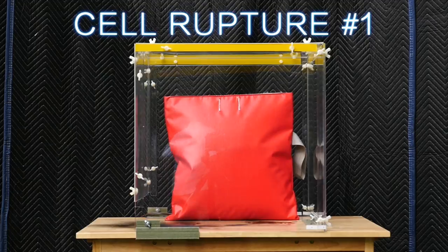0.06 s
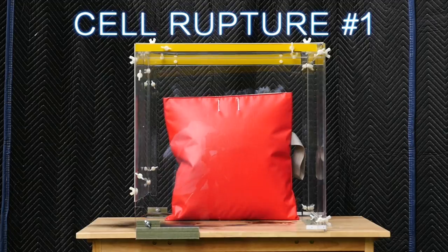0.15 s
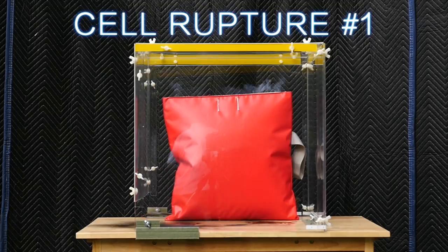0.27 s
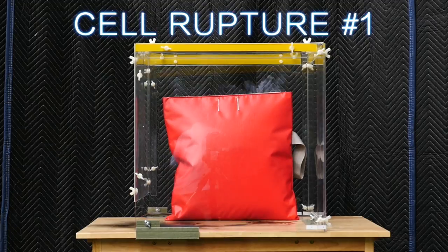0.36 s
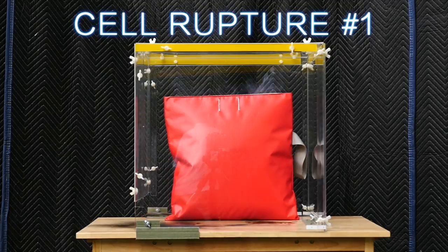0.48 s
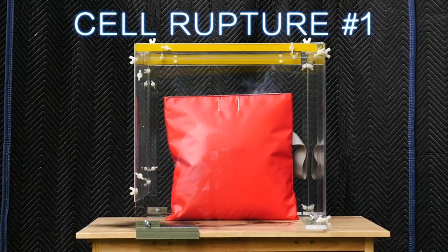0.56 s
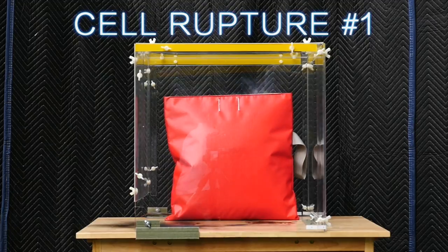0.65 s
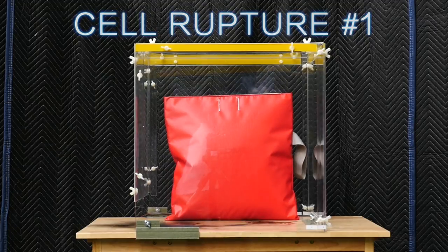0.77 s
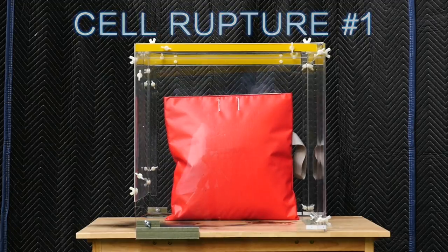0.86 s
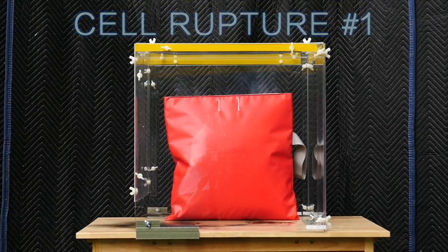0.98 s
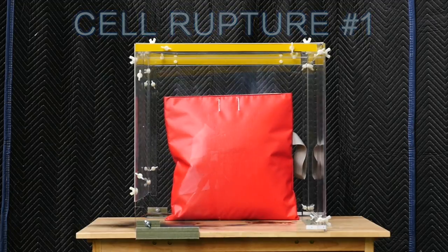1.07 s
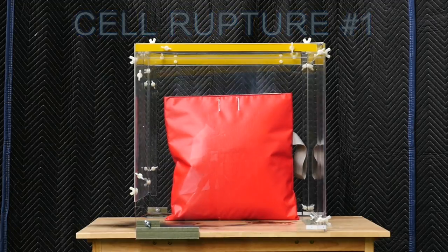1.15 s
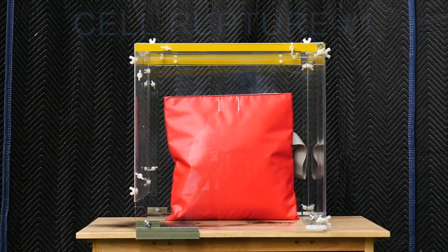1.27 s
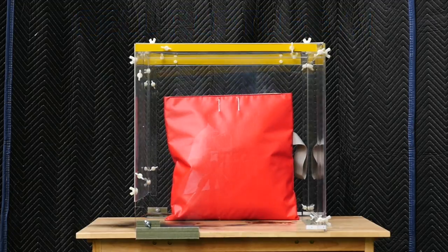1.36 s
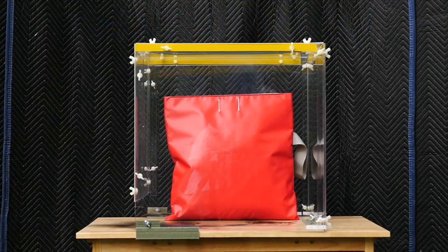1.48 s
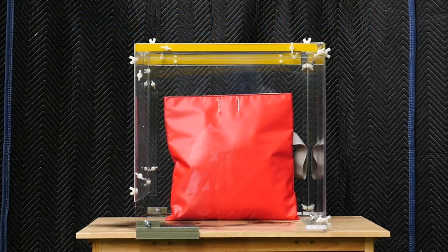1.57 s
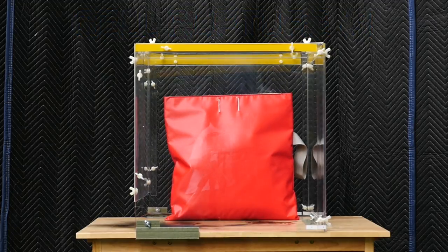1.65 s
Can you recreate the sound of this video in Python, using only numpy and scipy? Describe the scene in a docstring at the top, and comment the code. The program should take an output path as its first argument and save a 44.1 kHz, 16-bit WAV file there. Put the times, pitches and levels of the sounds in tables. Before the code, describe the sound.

Soft gas leak and low hum, then a muffled pop with a deep boom; venting gas gushes and puffs through a flapping bag inside a resonant clear box, with tiny crackles, heard by one overloaded microphone.

```python
"""A battery cell bursts with a dull pop inside a fabric bag that stands in a clear plastic box.
Gas vents in surges: filtered noise makes the jet, a duller gush and a hollow note near 440 Hz.
The bag flutters (low noise), thumps (short low swings) and puffs; the box's resonances colour the gas.
Small crackles, one falling squeak, a low hum and faint hiss lie around it.
One microphone hears it all; the loudest blows overload it."""
import sys
import numpy as np
from scipy.fft import rfft, irfft, next_fast_len
from scipy.io import wavfile
from scipy.ndimage import uniform_filter1d, map_coordinates

SR = 44100
rng = np.random.default_rng(int(sys.argv[2]) if len(sys.argv) > 2 else 0)


def unload_audio(sound):
    """Save the sound as a 16-bit wav file, at the path given as the first command line argument."""
    columns = np.transpose(np.atleast_2d(sound))
    # keep every value between -1 and 1, then stretch to whole-number steps
    steps = np.round(np.clip(columns, -1, 1) * 32767)
    wavfile.write(sys.argv[1], SR, steps.astype(np.int16))


N = 74970


def amp(db):
    """Decibels to gain."""
    return 10 ** (np.asarray(db) / 20)


def unit(x):
    """Scale to rms 1."""
    return x / np.sqrt(np.mean(x ** 2) + 1e-20)


def clock():
    """Time of each sample in seconds."""
    return np.arange(N) / SR


def curve(rows):
    """(start_s, value) points joined by straight lines."""
    return np.interp(clock(), *np.transpose(rows))


def wobble(rate):
    """A smooth random curve around 0 through normal draws, rate knots a second."""
    knots = rng.standard_normal(4096)
    return map_coordinates(knots, [clock() * rate + 2], mode="wrap")


def filtered(x, gain):
    """x with each frequency scaled by gain(hz); padding keeps the end off the start."""
    m = next_fast_len(N + SR // 4)
    spectrum = rfft(x, m) * gain(np.fft.rfftfreq(m, 1 / SR))
    return irfft(spectrum, m)[:N]


def swell(s, rise, fall):
    """An envelope that grows exponentially to 1 at time s and dies away."""
    t = clock() - s
    return np.exp(np.minimum(t / rise, -t / fall))


def hump(s, half):
    """A rounded envelope that peaks at time s."""
    return np.exp(-np.abs((clock() - s) / half) ** 2.28)


def heave(s, hz, half):
    """A few low swings of the bag around time s."""
    return np.cos(2 * np.pi * hz * (clock() - s)) * hump(s, half)


def sustained(x, size):
    """Even out the level of x over size samples, as a steady flow does."""
    power = np.abs(uniform_filter1d(x ** 2, size=size))
    return unit(x / np.sqrt(power + 0.28))


# resonances and notches of the plastic box: pitch_hz, lift_db
BOX_MODES = [(200, -10), (330, 5), (375, -9), (635, -3.5), (772, 4), (875, 9.5), (1005, 10.5), (1145, 13.5),
             (1255, 7), (1300, -16.5), (1382, 11), (1433, 7.5), (1510, 0.5), (1645, 6.5), (1710, 1),
             (1772, -3.5), (1877, 12.5), (2116, 5), (2215, -11), (2298, 6), (2480, 8), (2885, 5.5),
             (3252, -3.5), (3359, 13), (4296, -5.5), (4867, 10), (5432, 12.5), (6934, 11)]
BOX_WIDTH_HZ = 8.8  # from a mode's centre to half its lift in dB
BOX_RIPPLE_DB, BOX_RIPPLE_HZ = 1.8, 22  # depth and spacing of the many lesser resonances


def box_db(f):
    """Box gain in dB: the main modes plus a ripple of lesser ones, drawn anew at each call."""
    ripple = map_coordinates(rng.standard_normal(4096), [f / BOX_RIPPLE_HZ], mode="wrap")
    modes = sum(lift / (1 + ((f - centre) / BOX_WIDTH_HZ) ** 2) for centre, lift in BOX_MODES)
    return modes + BOX_RIPPLE_DB * ripple


def noise(colour, boxed=True):
    """Noise of rms 1 with the given spectrum, ringing in the box if boxed."""
    hz, db = np.transpose(colour)

    def gain(f):
        colour_db = np.interp(np.log(f + 1), np.log(hz), db)
        return amp(colour_db + (box_db(f) if boxed else 0))

    return unit(filtered(rng.standard_normal(N), gain))


HUM_HZ, HUM_DB = 84.2, -38.5
# level of the hiss, which sinks after the pop: start_s, level_db
HISS_LEVEL = [(0, -62.5), (.222, -58), (.235, -73.5), (.31, -68), (.36, -64.5), (.52, -69.5), (.8, -62),
              (1.2, -60), (1.7, -60)]
# spectrum of the hiss: pitch_hz, relative_db
HISS_COLOUR = [(1000, 5), (5000, 7), (6200, 0), (7500, 6.5), (8700, 4.5), (9200, 1), (9550, 7), (10000, 0),
               (12000, -1.5), (16000, -1)]


def background():
    """A low sine hum with a wandering phase, and faint hiss of bright noise outside the box's colour."""
    phase = 2 * np.pi * HUM_HZ * clock() + 1.2 * wobble(5.1)
    hum = amp(HUM_DB) * unit(np.sin(phase))
    return hum + amp(curve(HISS_LEVEL)) * noise(HISS_COLOUR, boxed=False)


SQUEAK_S, SQUEAK_HZ, SQUEAK_OCT_PER_S = 1.632, 3970, -11
SQUEAK_HALF_S, SQUEAK_DB = 0.016, -54.5


def squeak():
    """A faint whistle that falls in pitch, roughened by fast random pitch changes."""
    t = clock() - SQUEAK_S
    glide_hz = SQUEAK_HZ * 2 ** (SQUEAK_OCT_PER_S * np.clip(t, -.05, .05))
    hz = glide_hz + 260 * wobble(2700)
    tone = unit(np.sin(2 * np.pi * np.cumsum(hz) / SR))
    return amp(SQUEAK_DB) * swell(SQUEAK_S, SQUEAK_HALF_S, SQUEAK_HALF_S) * tone


# snaps from the hot cell: start_s, level_db, pitch_hz (centre of the band)
CRACKLE_EVENTS = [(.326, -55, 4950), (0.333, -54, 5540), (.365, -46.5, 4500), (0.369, -52.5, 4560),
                  (0.418, -57.5, 8100), (1.055, -52.5, 10840)]
CRACKLE_FALL_S, CRACKLE_OCTAVES = .003, .4  # octaves from the centre to half gain


def crackles():
    """Tiny bright snaps from the hot cell: short bursts of band-passed noise."""
    out = np.zeros(N)
    for s, db, hz in CRACKLE_EVENTS:
        def band_gain(f):
            octaves = np.log2((f + 1) / hz)
            return 1 / (1 + (octaves / CRACKLE_OCTAVES) ** 2)

        band = unit(filtered(rng.standard_normal(N), band_gain))
        out += amp(db) * swell(s, 0.00015, CRACKLE_FALL_S) * band
    return out


# flutter of the bag between its thumps: start_s, level_db
FLUTTER_LEVEL = [(0, -43), (.05, -28), (.1, -42.5), (.135, -31), (.17, -20.5), (.25, -11), (.3, -18),
                 (.43, -15), (.53, -16), (.605, -24.5), (.7, -16), (.87, -14.5), (.95, -14.5), (1.1, -22),
                 (1.2, -21.5), (1.36, -27), (1.46, -32), (1.7, -36.5)]
# spectrum of the flutter: pitch_hz, relative_db
FLUTTER_COLOUR = [(20, -26.5), (42, -19), (54, -2.5), (78, 5.5), (100, -0.5), (135, 1.5), (164, -5),
                  (188, -28), (300, -33.5), (500, -22.5), (1500, -99)]
# thumps of the bag: peak_s, peak_db, pitch_hz, half_length_s
THUMP_EVENTS = [(.339, 2.5, 74.4, 0.015), (0.417, -10.5, 78, 0.031), (0.458, -4, 105, .008),
                (.511, -2.5, 98.6, 0.0055), (.644, -10, 134, 0.0062), (.66, -2.5, 100, 0.0067),
                (0.784, -7.5, 128.5, 0.016), (.815, -6.5, 122.4, 0.021), (0.919, 2.5, 85.3, 0.013),
                (1.01, 0.5, 104.6, 0.0077), (1.207, -10.5, 115, 0.016), (1.296, -3, 111, 0.007),
                (1.337, -12.5, 122, 0.017), (1.408, -7, 120.6, 0.0069), (1.496, -16.5, 122, 0.0063)]
# puffs of gas forced out of the bag: peak_s, level_db, fall_s
PUFF_EVENTS = [(0.048, -33, 0.036), (.281, -35.5, 0.026), (0.525, -31.5, 0.027), (0.78, -31, 0.049),
               (0.91, -16, 0.017), (1.008, -21.5, 0.042), (1.076, -23, 0.0098), (1.158, -21, 0.0062),
               (1.283, -22, 0.021), (1.401, -19, 0.014), (1.494, -26.5, 0.014), (1.558, -33.5, 0.01),
               (1.618, -28.5, 0.0068)]
# spectrum of the puffs before the box: pitch_hz, relative_db
PUFF_COLOUR = [(100, -21.5), (220, -1.5), (370, -6.5), (440, 14.5), (540, 3), (800, -8.5), (1400, -18.5),
               (2200, -32), (3600, -38), (6000, -64.5), (16000, -83)]
PUFF_RISE_S = 0.0042


def bag():
    """The fabric flutters all along, thumps as it billows and lets out puffs of gas."""
    flutter = amp(curve(FLUTTER_LEVEL)) * sustained(noise(FLUTTER_COLOUR, boxed=False), size=1200)
    thumps = sum(amp(db) * heave(s, hz, half) for s, db, hz, half in THUMP_EVENTS)
    puff_envelope = sum(amp(db) * swell(s, PUFF_RISE_S, fall) for s, db, fall in PUFF_EVENTS)
    puffs = puff_envelope * sustained(noise(PUFF_COLOUR), size=500)
    return flutter + thumps + puffs


# hollow note of the vent: start_s, level_db (before the flicker)
NOTE_LEVEL = [(0, -61), (.35, -42.5), (.39, -33.5), (.45, -28), (.5, -37), (.57, -44.5), (.61, -25),
              (.715, -32), (.745, -32.5), (.79, -23.5), (.86, -30), (.92, -28.5), (1.08, -30),
              (1.11, -31.5), (1.17, -25), (1.3, -29.5), (1.37, -42), (1.41, -31), (1.46, -46), (1.5, -25.5),
              (1.54, -42), (1.7, -42)]
# spectrum of the note, narrow around its pitch: pitch_hz, relative_db
NOTE_COLOUR = [(330, -49), (395, -33.5), (418, 1), (436, 9), (462, -3), (495, -13), (550, -37.5),
               (700, -72.5)]
NOTE_FLICKER_DB, NOTE_FLICKER_RATE = 1.8, 55  # how the note breaks up: depth, knots a second


def vent_note():
    """A hollow, flickering resonance that the flow keeps ringing: a narrow band of noise."""
    level_db = curve(NOTE_LEVEL) + NOTE_FLICKER_DB * wobble(NOTE_FLICKER_RATE)
    return amp(level_db) * sustained(noise(NOTE_COLOUR, boxed=False), size=1800)


POP_S = .221  # the cell lets go; the vent opens from here
# strength of the gas jet: start_s, level_db (before the lift and roughness below)
JET_LEVEL = [(0.26, -54.5), (0.304, -62), (0.364, -50), (0.48, -54), (0.64, -48), (0.76, -52), (0.78, -47),
             (0.88, -45), (0.896, -41), (0.928, -37.5), (0.972, -46.5), (1.01, -38.5), (1.106, -47),
             (1.206, -41), (1.214, -42.5), (1.274, -50.5), (1.294, -44.5), (1.306, -49), (1.342, -43),
             (1.386, -51.5), (1.406, -42), (1.438, -49), (1.486, -47.5), (1.7, -55)]
# spectrum of the jet before the box: pitch_hz, relative_db
JET_COLOUR = [(150, -13), (230, -5.5), (370, 1), (480, 2.5), (700, -7.5), (1000, -13), (1500, -14),
              (2000, -16), (3000, -20.5), (4000, -27.5), (5000, -34.5), (7000, -39), (10000, -55.5),
              (16000, -64.5)]
JET_LIFT_DB, JET_ROUGH_DB = 10, 1
GRAIN_DB, GRAIN_RATE = 2.2, 450  # sputter of the jet: depth, knots a second
# strength of the duller gush through the fabric: start_s, level_db (before the roughness)
GUSH_LEVEL = [(.26, -38.5), (.33, -47), (.46, -40.5), (.5, -37.5), (.6, -39.5), (.66, -38), (.74, -39.5),
              (.8, -37.5), (.92, -38.5), (.97, -41), (1.07, -39), (1.25, -41), (1.38, -39), (1.45, -47),
              (1.7, -43.5)]
# spectrum of the gush before the box: pitch_hz, relative_db
GUSH_COLOUR = [(190, -16), (250, 7.5), (380, -0.5), (500, 1.5), (650, 5.5), (900, -4), (1150, -9),
               (1500, -28.5), (4000, -49)]
GUSH_ROUGH_DB = 4


def jet():
    """The surging, sputtering jet, and a duller gush through the fabric: noise of random level."""
    opened = np.clip((clock() - POP_S) / 0.017, 0, 1)
    roughness_db = JET_ROUGH_DB * wobble(90)
    sputter_db = GRAIN_DB * wobble(GRAIN_RATE)
    rush = amp(curve(JET_LEVEL) + JET_LIFT_DB + roughness_db + sputter_db) * noise(JET_COLOUR)
    gush = amp(curve(GUSH_LEVEL) + GUSH_ROUGH_DB * wobble(45)) * noise(GUSH_COLOUR)
    return opened * (rush + gush)


# gas leaking before and around the burst: start_s, level_db
LEAK_LEVEL = [(0, -42), (.035, -42), (.062, -31.5), (.088, -42.5), (.11, -33.5), (.16, -34.5), (.2, -27),
              (.25, -44.5), (.3, -42.5), (.38, -73)]
# spectrum of the leak before the box: pitch_hz, relative_db
LEAK_COLOUR = [(100, -12.5), (200, -5.5), (320, 3.5), (550, 3), (800, -8.5), (1200, -13.5), (2000, -19.5),
               (3200, -28.5), (5000, -45.5), (16000, -70)]
# spectrum of the dull pop: pitch_hz, relative_db
POP_COLOUR = [(35, -10.5), (60, -7), (160, 3.5), (195, -2), (240, 7), (300, -1.5), (450, -12), (650, -15),
              (900, -35), (1250, -24.5), (2000, -48), (4000, -62.5), (16000, -104)]
POP_DB, POP_HALF_S = -8.5, 0.024
# spectrum of the bright overload at the pop's peak, before box_db is added: pitch_hz, relative_db
OVERLOAD_COLOUR = [(200, -16.5), (650, -2), (1200, 1.5), (2000, -17), (4000, -27), (8000, -37),
                   (16000, -51.5)]
OVERLOAD_S, OVERLOAD_DB, OVERLOAD_FALL_S = .2235, -17.5, 0.002
BOOM_S, BOOM_DB, BOOM_HZ, BOOM_HALF_S = .2243, 1.5, 131.2, .01


def burst():
    """Gas leaks, the cell pops, the bag booms; a short bright burst of overload at the pop's peak."""
    leak = amp(curve(LEAK_LEVEL)) * noise(LEAK_COLOUR)
    pop_noise = sustained(noise(POP_COLOUR, boxed=False), size=500)
    pop = amp(POP_DB) * hump(POP_S, POP_HALF_S) * pop_noise
    overload = amp(OVERLOAD_DB) * swell(OVERLOAD_S, .0007, OVERLOAD_FALL_S) * noise(OVERLOAD_COLOUR)
    boom = amp(BOOM_DB) * heave(BOOM_S, BOOM_HZ, BOOM_HALF_S)
    return leak + pop + overload + boom


def scene():
    """Everything at one microphone."""
    return (burst() + jet() + vent_note() + bag() + crackles() + squeak() + background())[None]


TOP_HZ = 15800


def record(dry):
    """The loudest swings clip at the microphone; nothing is kept above the band limit."""
    clipped = np.clip(dry[0], -1, 1)
    return filtered(clipped, lambda f: f < TOP_HZ)[None]


dry = scene()
out = record(dry)
unload_audio(out)
```